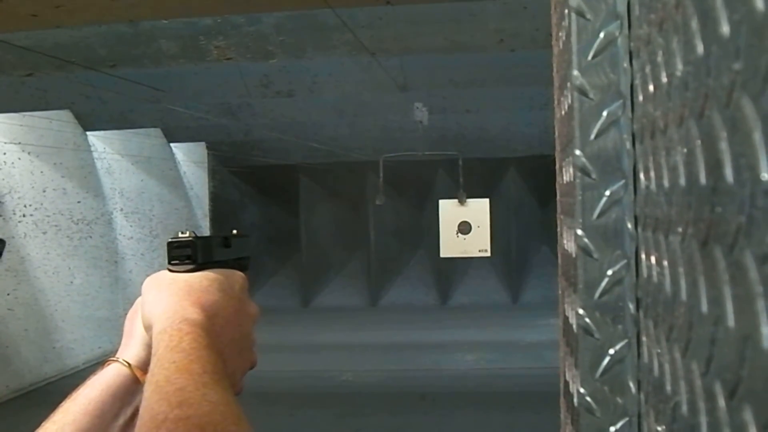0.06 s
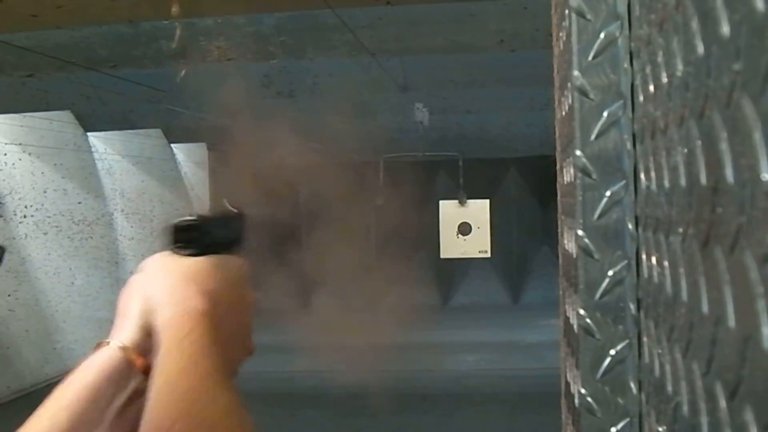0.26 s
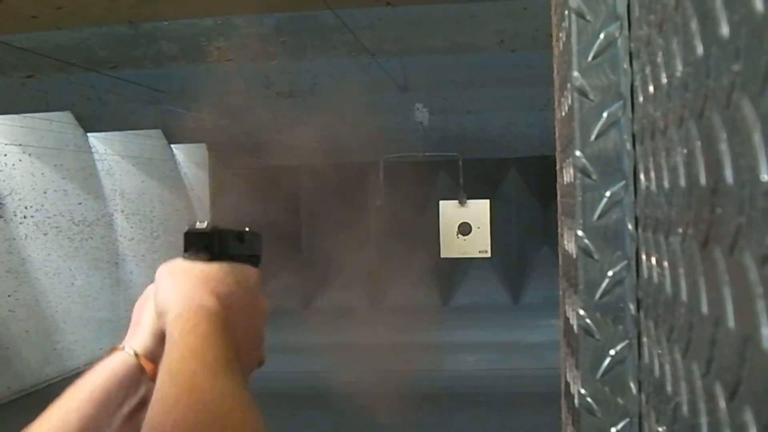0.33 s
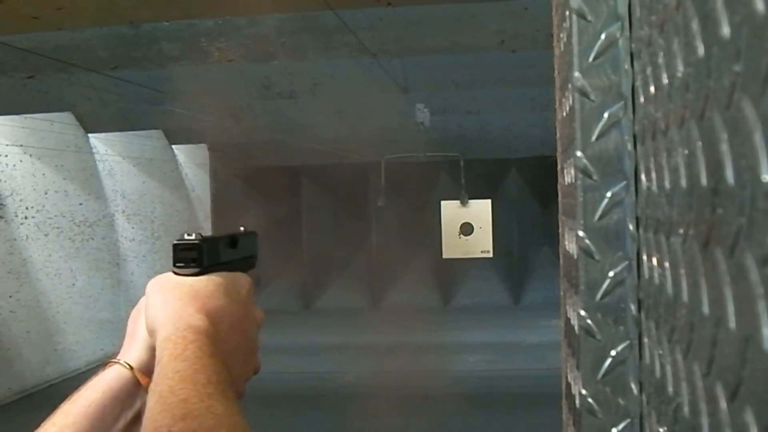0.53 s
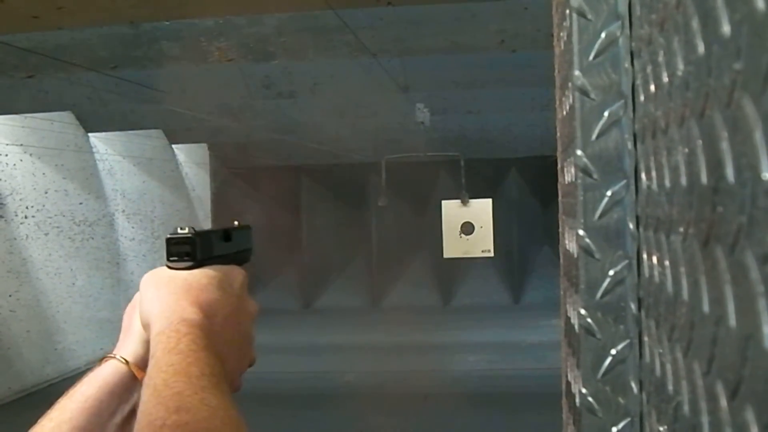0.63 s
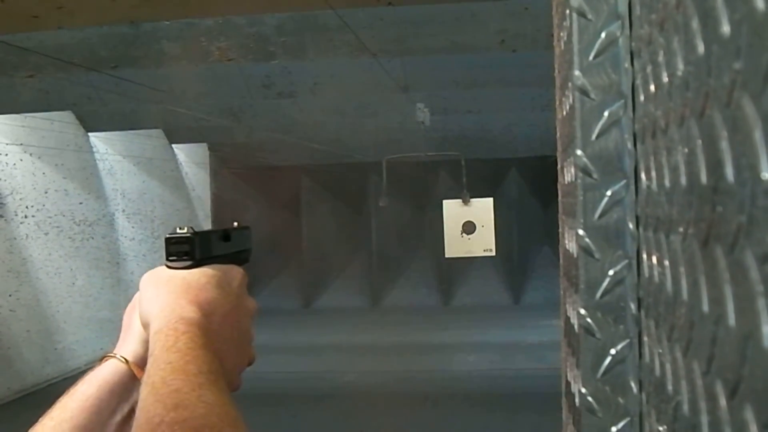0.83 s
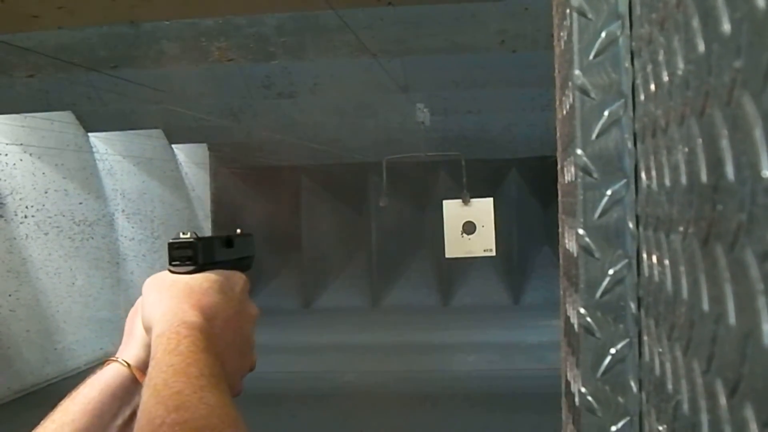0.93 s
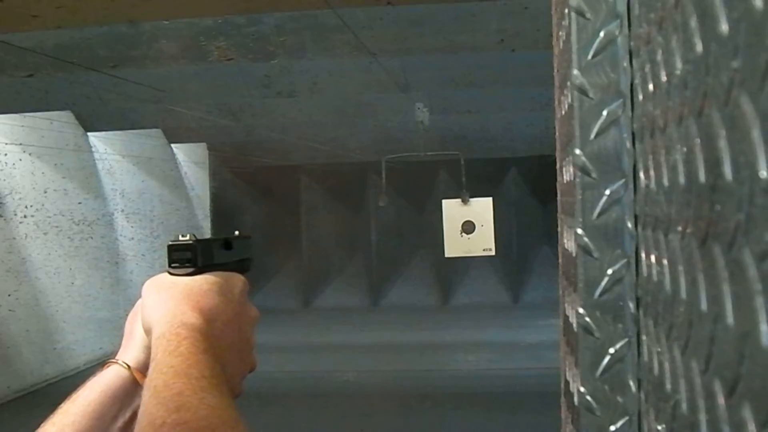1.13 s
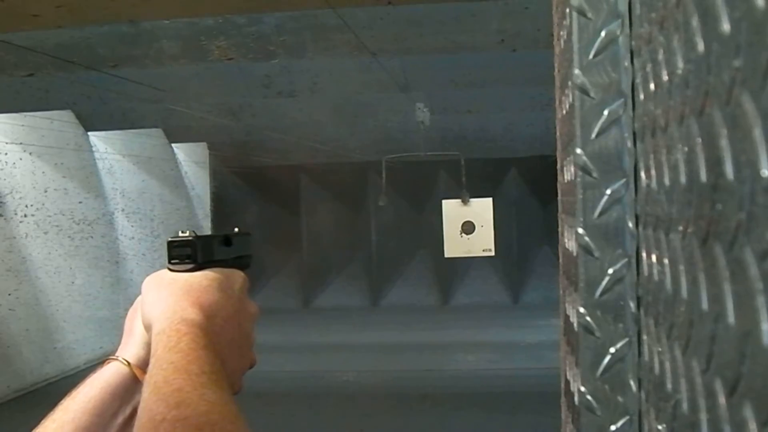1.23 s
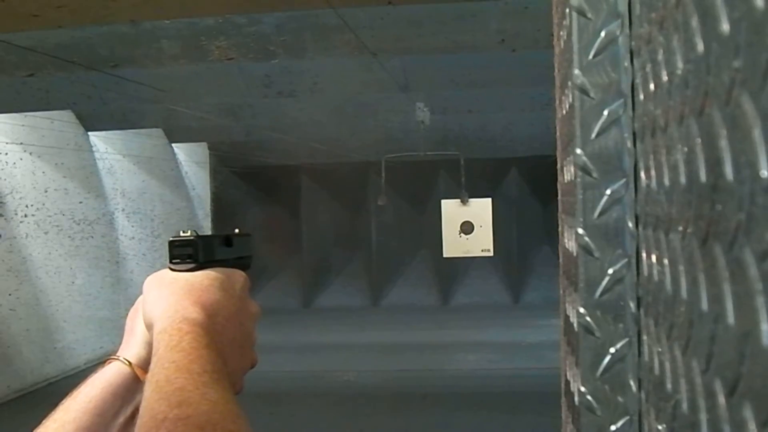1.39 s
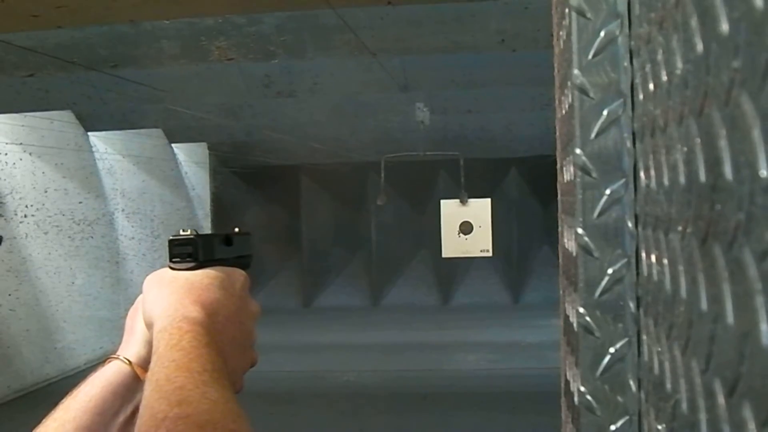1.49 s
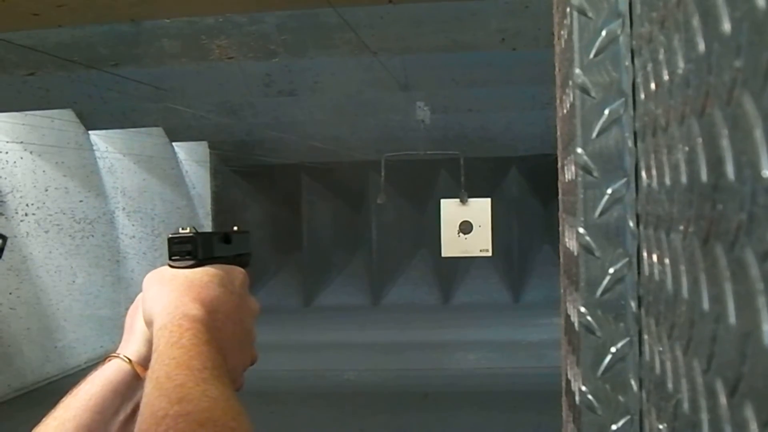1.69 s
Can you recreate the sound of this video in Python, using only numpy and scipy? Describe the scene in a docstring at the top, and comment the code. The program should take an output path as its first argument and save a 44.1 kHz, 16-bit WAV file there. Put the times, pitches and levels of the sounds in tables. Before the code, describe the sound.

One loud, echoing handgun shot indoors, followed by light clinks of a brass shell.

```python
"""Indoor range, in a booth: one pistol shot. The striker snaps, the muzzle blast overloads the
microphone and the concrete hall roars on. Gain control ducks too late, so the early roar clips.
The spent brass casing clinks off the booth's steel wall and the hard surfaces below.
Ventilation hums throughout."""
import sys
import numpy as np
from scipy import signal
from scipy.fft import rfft, irfft, next_fast_len
from scipy.io import wavfile
from scipy.ndimage import uniform_filter1d

SR = 44100
rng = np.random.default_rng(int(sys.argv[2]) if len(sys.argv) > 2 else 0)


def file_out(sig):
    """Save sig as 16-bit WAV at sys.argv[1]."""
    # one column per channel
    cols = np.atleast_2d(sig).T
    # limit, then scale
    lim = np.clip(cols, -1, 1)
    pcm = np.round(lim * 32767).astype(np.int16)
    wavfile.write(sys.argv[1], SR, pcm)


N = 77175

SHOT_S, HALL_DELAY_S = 0.2, 0.019
MODE_SIDE_DB = -22.5  # stereo spread of the wall and boom tones


def amp(db):
    """Decibels to gain."""
    return 10 ** (np.asarray(db) / 20)


def unit(x):
    """Scale to rms 1."""
    return x / np.sqrt(np.mean(x ** 2) + 1e-20)


def along(points, hz):
    """Interpolate (frequency [Hz], value) points on a log axis."""
    freqs, values = np.transpose(points)
    return np.interp(np.log(hz + 1), np.log(freqs + 1), values)


def filtered(x, response):
    """Apply the gain response(hz) by FFT."""
    size = next_fast_len(N + SR // 4)
    return irfft(rfft(x, size) * response(np.fft.rfftfreq(size, 1 / SR)), size)[..., :N]


def since(start_s):
    """Seconds since start_s, zero before."""
    return np.maximum(np.arange(N) / SR - start_s, 0)


def fall(start_s, t60_s, rise_s=0.00029):
    """Envelope with exponential rise and decay."""
    t = since(start_s)
    return (1 - np.exp(-t / rise_s)) * np.exp(-np.log(1000) * t / t60_s)


def pan(db):
    """Stereo gains, left over right by db."""
    return amp(np.array([[db], [-db]]) / 2)


def spread(x, side_db):
    """A ringing sound reaches the two microphones out of phase."""
    side = np.imag(signal.hilbert(x, next_fast_len(2 * N))[:N])
    return x + amp(side_db) * np.array([side, -side])


def noise(spectrum, width=None):
    """Coloured stereo noise, rms 1; by default wider in the treble."""
    # (frequency [Hz], side over mid [dB])
    room_width = [(60, -22), (160, -18), (500, -16.5), (1200, -10.5), (2000, -10), (3300, -1), (6000, 0.5),
                  (15000, 2.5)]

    def mid_side_gains(hz):
        angle = np.arctan(amp(along(width or room_width, hz)))
        return amp(along(spectrum, hz)) * [np.cos(angle), np.sin(angle)]

    mid, side = filtered(rng.standard_normal((2, N)), mid_side_gains)
    return unit(np.array([mid + side, mid - side]))


def burst(x, envelope):
    """Noise under a short envelope, scaled to the envelope's energy."""
    return unit(x * envelope) * np.sqrt(np.mean(envelope ** 2))


def fading(x, start_s, t60s):
    """From start_s, each frequency decays at its own rate."""
    hz, t, bins = signal.stft(x, SR, nperseg=1024)
    decay = np.exp(-np.log(1000) * np.maximum(t - start_s, 0) / along(t60s, hz)[:, None])
    return signal.istft(bins * decay, SR)[1][:, :N]


def ring(modes, start_s, rise_s):
    """Struck damped modes, levels scattered by 1 dB."""
    t = since(start_s)
    return sum(amp(db + rng.normal()) * fall(start_s, t60_s, rise_s) * np.sin(2 * np.pi * hz * t)
               for hz, db, t60_s in modes)


def echo(x, tail):
    """Convolve with a stereo tail, left channel scaled to energy 1."""
    return signal.fftconvolve(x, tail / np.linalg.norm(tail[0]), axes=1)[:, :N]


def ventilation():
    """Rushing air and a slightly unsteady motor hum."""
    # airflow (frequency [Hz], level [dB])
    air_spectrum = [(25, -25), (70, -8.5), (120, 3), (220, -9.5), (460, -4), (575, 6.5), (700, -8),
                    (1500, -8.5), (3000, -19), (15000, -25.5)]
    air_db, hum_db, hum_hz = -46, -50.5, 117.5
    drift = filtered(rng.standard_normal(N), lambda hz: np.exp(-(hz / 5) ** 2))
    hum = np.sqrt(2) * np.sin(2 * np.pi * hum_hz * since(0) + 1.3 * unit(drift))
    return amp(air_db) * noise(air_spectrum) + amp(hum_db) * hum


def bench_thud():
    """The casing lands on the bench."""
    # impact (frequency [Hz], level [dB])
    thud_spectrum = [(25, -20), (70, -4), (140, 15), (300, -16), (3000, -65)]
    return amp(-15) * burst(noise(thud_spectrum), fall(0.7935, t60_s=0.037))


def steel_knocks():
    """Hard casing hits clack and ring the steel's bright modes."""
    # hits (time [s], clack [dB], ring [dB])
    knocks = [(0.7927, -10.5, -32), (1.501, -20.5, -30.5), (1.5238, -20, -42)]
    # impact (frequency [Hz], level [dB])
    clack_spectrum = [(400, -18), (3000, -1), (6000, -1), (14000, -8)]
    # struck steel (frequency [Hz], level [dB], t60 [s])
    steel_modes = [(2790, 3, 0.032), (3706, 0.5, 0.03), (5390, -4, .024), (6460, -1, 0.018)]
    clack = noise(clack_spectrum)
    hits = np.zeros((2, N))
    for at_s, clack_db, ring_db in knocks:
        hits += amp(clack_db) * burst(clack, fall(at_s, t60_s=0.0097))
        hits += amp(ring_db) * spread(ring(steel_modes, at_s, rise_s=0.00079), side_db=-5)
    return hits


def clink_reverb(impacts, brass):
    """The booth echoes the impacts; the hall echoes impacts and brass ring."""
    # hall decay (frequency [Hz], t60 [s])
    tail_t60s = [(3000, 0.49), (8000, 0.51), (15000, 0.3)]
    booth_tail = rng.standard_normal((2, N)) * fall(0.0023, t60_s=0.097)
    hall_tail = fading(rng.standard_normal((2, N)), 0, tail_t60s) * (1 - np.exp(-since(0) / 0.022))
    return amp(-6) * echo(impacts, booth_tail) + amp(-16.5) * echo(impacts + brass, hall_tail)


def casing():
    """Contacts click and ring the spinning brass; a soft room echo rustles after the bench hit."""
    # casing contacts, plus the room echo at 0.859 s
    # (time [s], click [dB], click t60 [s], ring [dB], ring t60 [s], room send [dB], left-right [dB])
    events = [(.4394, -28, 0.012, -7, 0.046, 0, -3), (.66, 3, 0.0055, -21.5, 0.25, -3, 8),
              (0.786, -16.5, 0.023, -55, .05, 1, -14), (0.7939, -2.5, 0.022, -46, .05, -1.5, 1),
              (.859, -33.5, 0.17, -60, .05, 4.5, 0), (1.3102, -38.5, 0.0099, -43, 0.18, 0, 8),
              (1.4985, -6, .012, -46, 0.11, 0.5, 3.5), (1.5236, -28, .03, -22.5, 0.1, -2, 6),
              (1.6063, -31, 0.015, -65, .05, 0, 0)]
    # click (frequency [Hz], level [dB])
    click_spectrum = [(300, -31), (1500, -29), (2700, -6), (6800, -1), (9200, 2), (11500, -0.5),
                      (15500, -1)]
    # beating pair of casing modes (frequency [Hz], level [dB])
    brass_modes = [(9880, -5.5), (9520, -18)]
    # short top mode (frequency [Hz], level [dB], t60 [s])
    top_mode = [(13780, -8, 0.0067)]
    tumble_hz, tumble_depth, click_rise_s = 40, 0.51, 0.00072
    click = noise(click_spectrum)
    direct = room_send = steel_knocks()
    thud = bench_thud()
    brass = np.zeros(N)
    for at_s, click_db, click_t60_s, ring_db, ring_t60_s, send_db, pan_db in events:
        tick = amp(click_db) * burst(click, fall(at_s, click_t60_s, click_rise_s))
        ping = amp(click_db) * ring(top_mode, at_s, click_rise_s)
        direct = direct + pan(pan_db) * (tick + ping)
        room_send = room_send + amp(send_db) * tick
        tumble = 1 + tumble_depth * np.cos(2 * np.pi * tumble_hz * since(at_s))
        modes = [(hz, db, ring_t60_s) for hz, db in brass_modes]
        brass += amp(ring_db) * tumble * ring(modes, at_s, rise_s=0.0063)
    return thud + direct + spread(brass, side_db=-5) + clink_reverb(room_send, brass)


def wall():
    """The steel booth wall rings from the blast, then faintly from the casing's late knock."""
    # (frequency [Hz], level from blast [dB], level from knock [dB], t60 [s])
    wall_modes = [(398.5, -23.5, -40.5, 2.2), (423, -16.5, -67, 2.47), (507, -25.5, -62.5, 3.07),
                  (641.6, -12.5, -39.5, 2.36), (1217, -18.5, -63, 2.4)]
    blown = ring([(hz, db, t60) for hz, db, _, t60 in wall_modes], SHOT_S + HALL_DELAY_S, rise_s=0.058)
    knocked = ring([(hz, db, t60) for hz, _, db, t60 in wall_modes], start_s=1.5, rise_s=0.0063)
    return spread(blown + knocked, MODE_SIDE_DB)


def boom():
    """A resonance of the range swells at each return of the blast wave."""
    # (time [s], level [dB])
    wave_returns = [(0.274, 4.5), (.335, 3.5), (.51, -7), (0.621, -4.5)]
    resonance_hz = 424
    swells = sum(amp(db) * fall(at_s, t60_s=0.2, rise_s=0.021) for at_s, db in wave_returns)
    return spread(swells * np.sin(2 * np.pi * resonance_hz * since(SHOT_S)), MODE_SIDE_DB)


def hall():
    """The roar builds, surges with baffle echoes, darkens as it dies and leaves a faint tail."""
    # reverberation (frequency [Hz], level [dB])
    roar_spectrum = [(25, -55), (65, -16), (130, -11), (270, -12), (410, -2.5), (700, -3), (1300, -4),
                     (2000, -11.5), (3000, -12), (5000, -11), (7000, -13), (10000, -12), (15000, -14.5)]
    # its decay (frequency [Hz], t60 [s])
    roar_t60s = [(60, 1.36), (400, 1.685), (1400, 1.652), (3000, 1.528), (5000, 1.085), (8000, 0.69),
                 (13000, 0.47)]
    # ceiling baffle echoes (time [s], level [dB])
    slap_echoes = [(.254, -3.5), (0.285, 9), (0.309, 7.5), (.457, -5.5), (0.511, -11.5)]
    # their colour (frequency [Hz], level [dB])
    slap_spectrum = [(150, -18), (500, -1.5), (1400, 2), (7000, -9), (14000, -18)]
    # slowly fading midrange tail of the roar (frequency [Hz], level [dB])
    tail_spectrum = [(60, -31.5), (250, -14), (800, -1), (1500, -3.5), (2800, -13), (5000, -33),
                     (12000, -58)]
    roar = amp(6.5) * fading(noise(roar_spectrum), SHOT_S, roar_t60s)
    surges = sum(amp(db) * fall(at_s, t60_s=0.086, rise_s=0.01) for at_s, db in slap_echoes)
    slaps = surges * noise(slap_spectrum)
    tail = amp(-24) * fall(SHOT_S, t60_s=4.55) * noise(tail_spectrum)
    build_up = 1 - np.exp(-since(SHOT_S + HALL_DELAY_S) / 0.015)
    return (roar + slaps + tail) * build_up


def striker():
    """The sear slips and the striker lands, just ahead of the blast."""
    # pistol action (frequency [Hz], level [dB])
    action_spectrum = [(200, -12.5), (1200, -11), (1900, 2), (2500, -8), (3500, -1.5), (6300, 4.5),
                       (7600, -6), (9500, 4.5), (12000, -7)]
    strike_s, slip_lead_s = 0.188, 0.0054
    action = noise(action_spectrum)
    slip = amp(-15) * burst(action, fall(strike_s - slip_lead_s, t60_s=0.079, rise_s=0.0018))
    snap = amp(-5) * burst(action, fall(strike_s, t60_s=0.0019))
    return slip + snap


def shot():
    """Muzzle blast, its first echoes in the booth and gas gusts on the microphone."""
    # muzzle blast (frequency [Hz], level [dB])
    blast_spectrum = [(100, -29), (600, -18), (2000, -5), (4500, 3), (7000, -3.5), (14000, 3.5)]
    # echoes between the booth walls (frequency [Hz], level [dB])
    booth_spectrum = [(100, -25), (500, -10), (1500, -2.5), (4400, 1.5), (5500, -10), (15000, -7.5)]
    # muzzle gas (frequency [Hz], level [dB])
    gas_spectrum = [(20, -22), (55, 3), (85, -5), (160, -27.5), (1000, -80)]
    # its arrivals (time [s], level [dB])
    gas_hits = [(0.232, -8.5), (.285, -13), (.338, -8.5)]
    booth_delay_s = 0.0063
    blast = amp(17) * fall(SHOT_S, t60_s=0.04) * noise(blast_spectrum, width=[(1000, 0.59)])
    booth = amp(9) * fall(SHOT_S + booth_delay_s, t60_s=0.083, rise_s=0.0061) * noise(booth_spectrum)
    gas = noise(gas_spectrum)
    gusts = sum(amp(db) * burst(gas, fall(at_s, t60_s=0.1, rise_s=0.0096)) for at_s, db in gas_hits)
    return blast + booth + gusts


def scene():
    """All sources at the two microphones."""
    return striker() + shot() + pan(0.5) * (hall() + wall() + boom()) + casing() + ventilation()


def record(dry):
    """Slow gain control, clipping, a narrow treble notch and the band limit."""
    threshold_db, slope, lag_s = -8.5, 0.78, 0.095
    notch_hz, notch_width_hz, notch_depth = 7830, 265, 0.77
    ceiling, top_hz = 0.97, 15700
    power = np.abs(uniform_filter1d(np.mean(dry ** 2, axis=0), size=441))
    excess_db = np.maximum(10 * np.log10(power + 1e-12) - threshold_db, 0)
    pole = np.exp(-1 / (lag_s * SR))
    ducked = dry * amp(-slope * signal.lfilter([1 - pole], [1, -pole], excess_db))
    clipped = ducked / (1 + np.abs(ducked / ceiling) ** 12) ** (1 / 12)
    notch = lambda hz: 1 - notch_depth * np.exp(-((hz - notch_hz) / notch_width_hz) ** 2)
    low_pass = lambda hz: 1 / np.sqrt(1 + (hz / top_hz) ** 240)
    return filtered(clipped, lambda hz: notch(hz) * low_pass(hz))


dry = scene()
out = record(dry)
file_out(out)
```